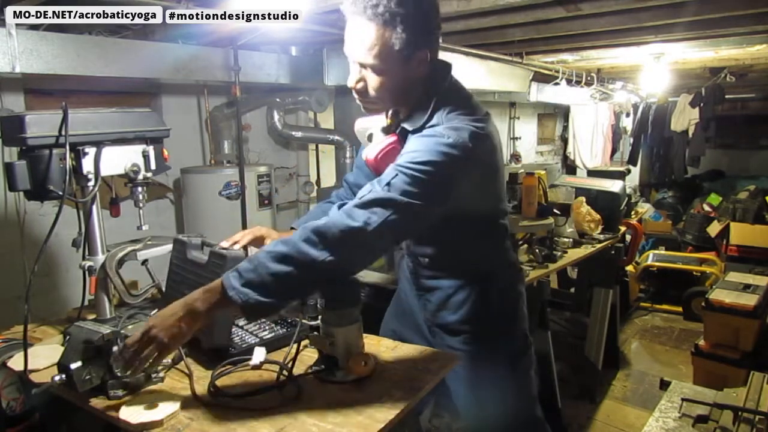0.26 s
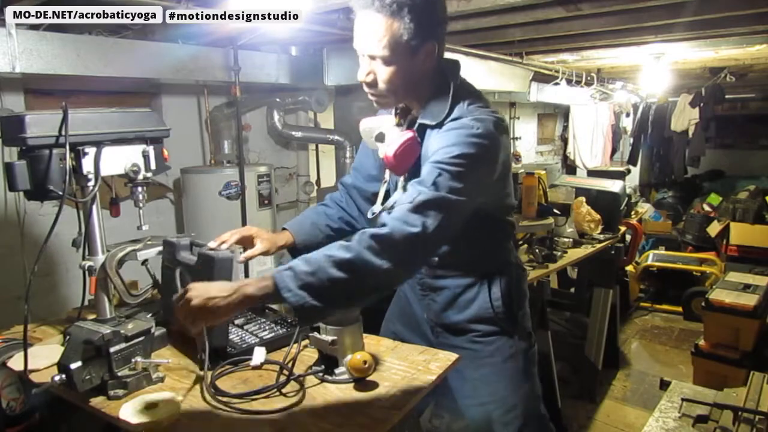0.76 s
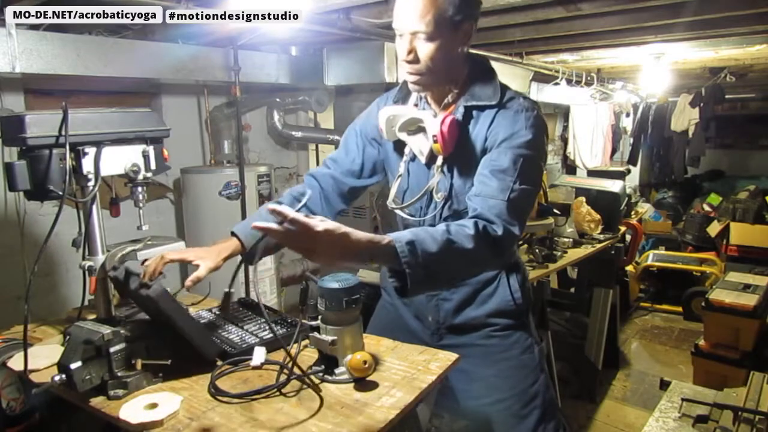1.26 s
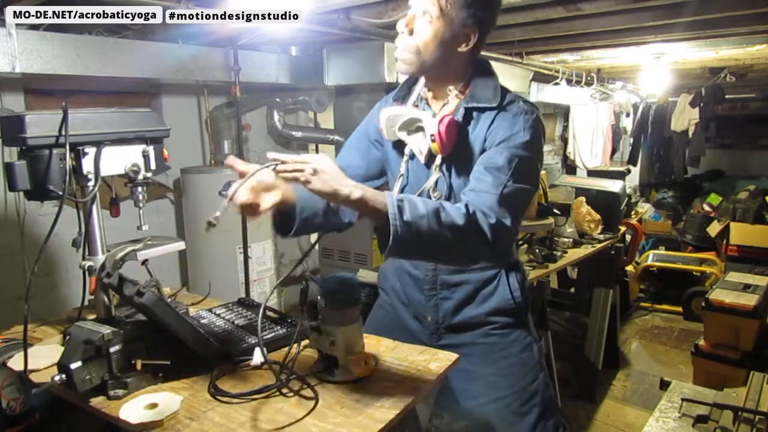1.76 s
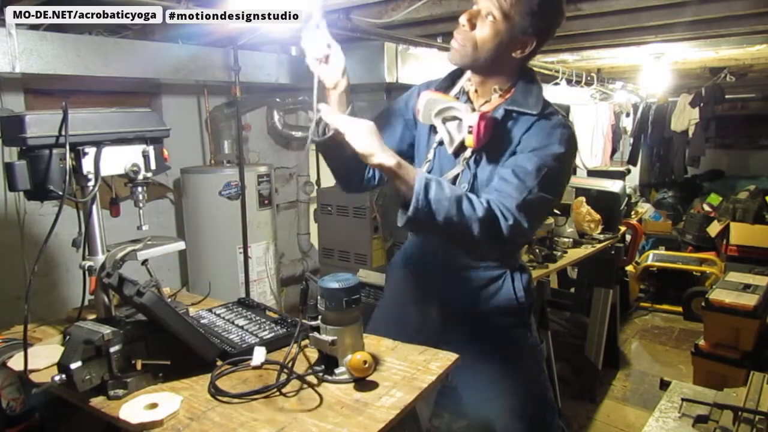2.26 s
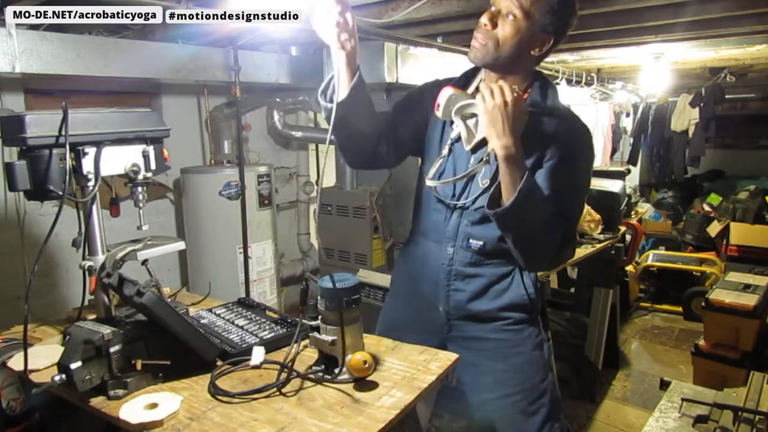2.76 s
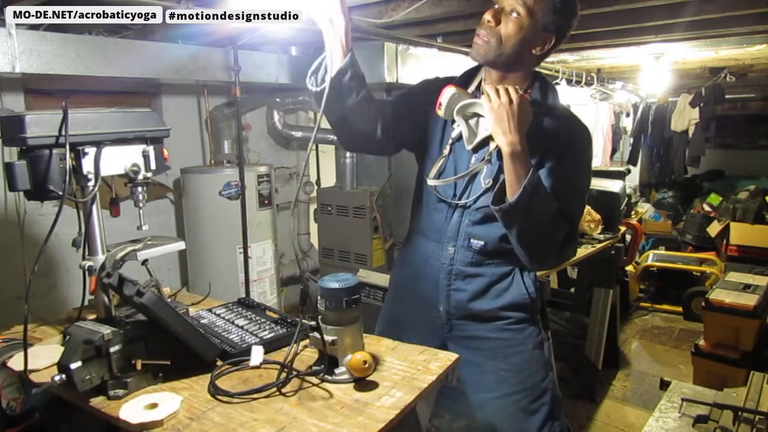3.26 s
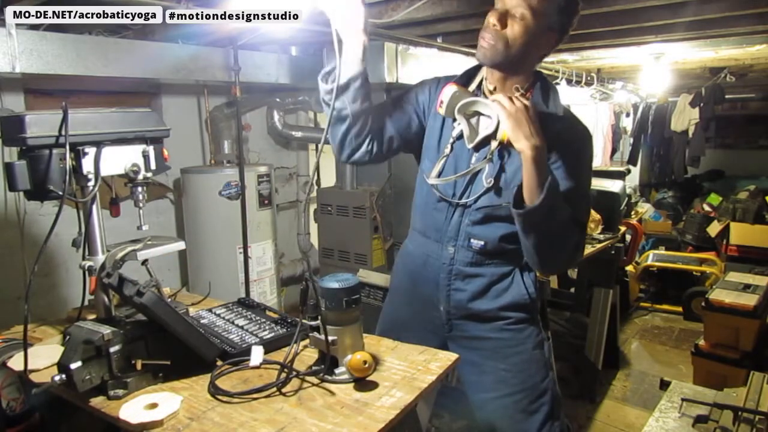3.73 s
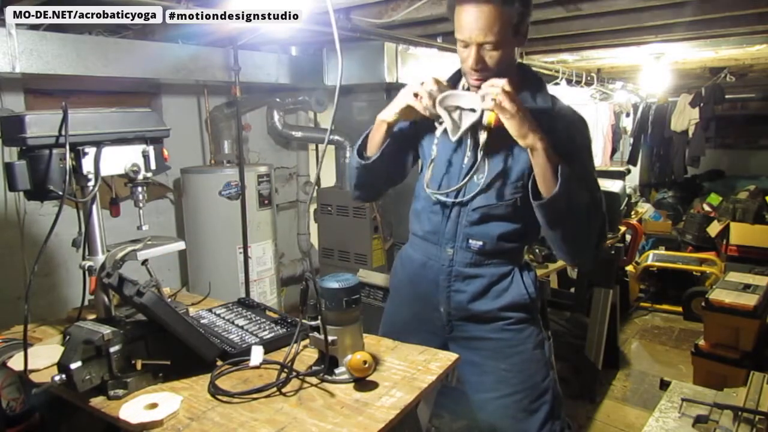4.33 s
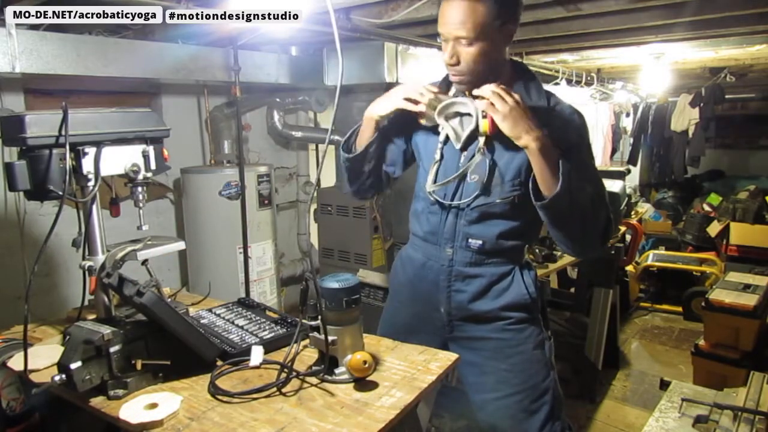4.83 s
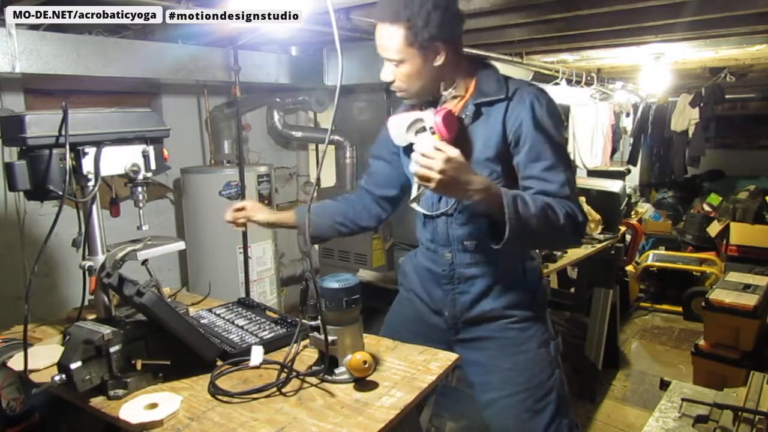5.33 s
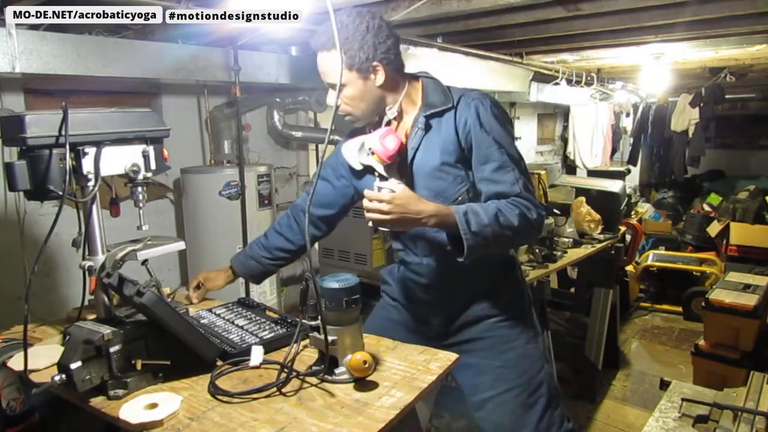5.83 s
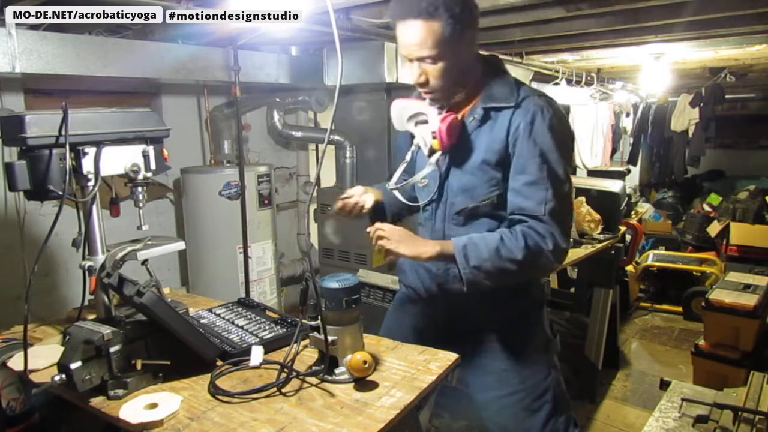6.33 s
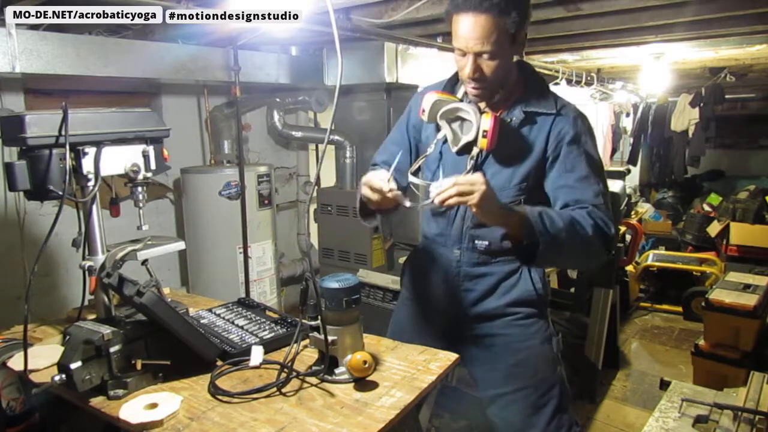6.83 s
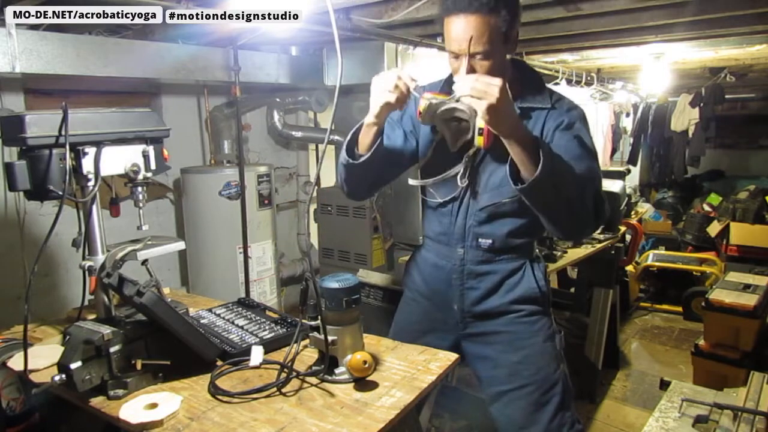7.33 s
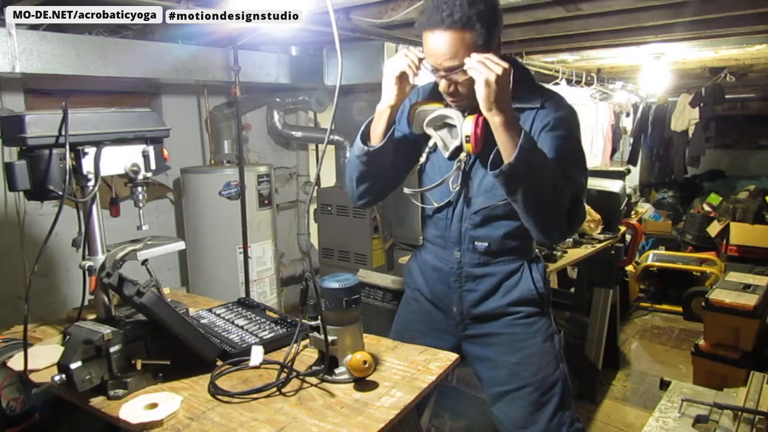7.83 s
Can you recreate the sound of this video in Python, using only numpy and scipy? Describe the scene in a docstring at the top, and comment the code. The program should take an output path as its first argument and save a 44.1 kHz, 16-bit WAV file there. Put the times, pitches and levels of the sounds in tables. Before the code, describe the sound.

In a basement workshop, a sharp case knock, bench thud, clattering ceiling plug, bright mask and glasses clicks, rustling overalls and a soft duct hum.

```python
"""In a low, cluttered basement workshop a hand knocks and drags a plastic tool case on a wooden bench, pushes a
plug into a ceiling socket, and handles a mask and glasses; overalls rustle. Blows are bursts of noise with ringing
modes, drags are random slips ringing a hollow body, and cloth is shaped noise that swells and flickers.
A tail of scattered echoes follows the handling. A distant blower (shaped noise) swells over the microphone hiss."""
import sys
import numpy as np
from scipy import signal
from scipy.io import wavfile
from scipy.ndimage import uniform_filter1d

SR = 44100
rng = np.random.default_rng(int(sys.argv[2]) if len(sys.argv) > 2 else 0)


def unload_audio(sound):
    """Save the sound as a 16-bit wav file, at the path given as the first command line argument."""
    columns = np.transpose(np.atleast_2d(sound))
    # keep every value between -1 and 1, then stretch to whole-number steps
    steps = np.round(np.clip(columns, -1, 1) * 32767)
    wavfile.write(sys.argv[1], SR, steps.astype(np.int16))


N = 356857  # length of the scene in samples


def gain_of(db):
    """Turns decibels into a factor."""
    return 10 ** (np.asarray(db) / 20)


def evened(x):
    """Scales a sound to rms 1."""
    return x / np.sqrt(np.mean(x ** 2) + 1e-20)


def read(points, hz):
    """Reads a table of values against pitch, on a log-frequency axis."""
    f, value = np.transpose(points)
    return np.interp(np.log(hz + 1), np.log(f + 1), value)


def along(rows, t):
    """Reads the columns of a table of curves at the times t."""
    s, *columns = np.transpose(rows)
    return [np.interp(t, s, c) for c in columns]


def add(mix, s, sound):
    """Mixes a two-channel sound in at time s, cutting off what runs past the end."""
    part = mix[:, round(s * SR):][:, :sound.shape[1]]
    part += sound[:, :part.shape[1]]


def band(x, lo_hz, hi_hz, order=3):
    """Keeps only the pitches between two limits."""
    sos = signal.butter(order, [lo_hz, hi_hz], "bandpass", fs=SR, output="sos")
    return signal.sosfilt(sos, x)


def placed(sound, pan_db):
    """Pans a sound between the two ports; positive is towards the left."""
    return sound * gain_of([[pan_db / 2], [-pan_db / 2]])


def swell(t, start, length, skew, point):
    """An arch from silence to 1 and back; skew under 1 peaks early, a higher point is sharper."""
    progress = np.clip((t - start) / length, 0, 1)
    return abs(np.sin(np.pi * progress ** skew)) ** point


def unit(db):
    """Turns a spectrum in dB into magnitudes of total power 1."""
    magnitude = gain_of(db)
    return magnitude / np.linalg.norm(magnitude, axis=0) * np.sqrt(len(db))


def paired(left, other, same):
    """Makes a right channel that is like the left one by the share same (0 is unrelated)."""
    return np.array([left, same * left + np.sqrt(1 - same ** 2) * other])


def noise(shape, same, size):
    """Two-channel noise built from random spectra whose short-time magnitude is shape(hz, t)."""
    hz = np.fft.rfftfreq(size, 1 / SR)[:, None]
    t = np.arange(4 * N // size + 5) * size / 4 / SR
    a, b, c, d = rng.standard_normal((len(t), len(hz), 4)).T
    likeness = np.clip(read(same, hz), -1, 1)
    spectra = paired(a + 1j * b, c + 1j * d, likeness) * shape(hz, t)
    sound = signal.istft(spectra, nperseg=size, noverlap=3 * size // 4)[1]
    return sound[:, :N] / np.sqrt(size / 3)


def ringing(modes):
    """The modes of an object, all set off by one contact at a random spot, peak 1."""
    t = np.arange(SR // 2) / SR
    hz, db, t60 = np.transpose(modes)[:, :, None]
    spot = gain_of(1.34 * rng.standard_normal((len(modes), 1)))  # the spot favours some modes
    ring = (spot * gain_of(db - 60 * t / t60) * np.sin(2 * np.pi * hz * t)).sum(0)
    return ring / abs(ring).max()


def rings(rows, modes):
    """Things that ring on with their modes alone."""
    mix = np.zeros((2, N))
    for s, db in rows:
        add(mix, s, placed(gain_of(db) * ringing(modes), -1.9))
    return mix


def blows(rows, modes, knock, tick_width, ring_db, click_db, crack_t60, pan_db):
    """Each blow is a click, a dense crack and the object's modes, heard in a low knock band and a tick band."""
    t, mix = np.arange(SR // 2) / SR, np.zeros((2, N))
    for s, knock_db, tick_db, tick_at in rows:
        ring = gain_of(ring_db) * ringing(modes)
        shared, left, right = rng.standard_normal((len(t), 3)).T
        click = gain_of(click_db - 60 * t / 0.00092) * shared  # the first contact is the sharpest
        sound = 0
        for level_db, (at, width) in (knock_db, knock), (tick_db, (tick_at, tick_width)):
            edges_hz = 1000 * 2. ** (at + abs(width) * np.array([-.5, .5]))
            lo, hi = np.minimum(edges_hz, [SR / 4, SR / 3])
            own = 3.0 * lo / 6500  # the ports hear the finest cracks differently
            fade = gain_of(-60 * t / (crack_t60 * (1000 / lo) ** 0.033))
            crack = (shared + click + own * np.array([left, right])) * fade
            crack = signal.lfilter([1], [1, -.65], crack)  # two filters soften the treble
            crack = signal.lfilter([.15], [1, -.85], crack)
            rise = np.minimum(t * lo / 0.61, 1)  # low knocks rise slower
            part = band((ring + crack) * rise, lo, hi, order=2)
            sound = sound + gain_of(level_db) * part / abs(part).max()
        add(mix, s, placed(sound, pan_db))
    return mix


def drags(rows, resonances):
    """Stick-slip clicks of uneven size ring a hollow body; the finest grit is heard directly."""
    mix = np.zeros((2, N))
    for start, length, level_db, grit_db in rows:
        t = np.arange(0, length, 1 / SR)
        chance, size, fine = rng.random((N // 10, 3))[:len(t)].T
        slip_size = gain_of(2.05 * np.minimum(-np.log(size + 1e-9), 3.5))
        slips = slip_size * (chance < 600 / SR)  # about 600 slips a second
        slips = evened(slips - slips.mean()) + 2.7 * (fine - .5)
        hollow = sum(gain_of(db) * evened(band(slips, hz - w / 2, hz + w / 2, order=1))
                     for hz, w, db in resonances)
        hollow = evened(band(hollow, 490, 3070, order=2))
        grit = evened(band(signal.lfilter([1], [1, -.85], slips), 2000, 7100, order=2))
        grip = uniform_filter1d(uniform_filter1d(fine - .5, size=300), size=300)
        sound = gain_of(level_db + 2.04 * evened(grip)) * (hollow + gain_of(grit_db) * grit)  # uneven pressure
        # each drag swells quickly, then fades away
        add(mix, start, placed(sound * swell(t, 0, length, skew=0.59, point=1.8), 0.0))
    return mix


def hiss():
    """Steady noise of the widened microphone pair."""
    # colour of the hiss: pitch_hz, relative level_db (per Hz)
    hiss_colour = [(12, -33), (20, -14), (74, 1), (270, -7), (337, -9.5), (388, -9), (1000, -15),
                   (1190, -14.5), (3250, -24), (7730, -27.5), (14700, -35.5), (16000, -40)]
    # left-right likeness: pitch_hz, likeness (1 is identical, below 0 is opposed)
    hiss_same = [(60, -0.76), (180, -0.41), (550, -0.43), (1650, -0.2), (4970, 0.1), (15000, 0.11)]
    return gain_of(-50) * noise(lambda hz, t: unit(read(hiss_colour, hz)), hiss_same, size=2048)


def blower():
    """Air roar through ducts, a fuzzy duct hum and a lumpy rumble, all shaped noise."""
    # strength over time: time_s, roar_db, hum_db
    strength = [(0.0, -70, -64), (1.6, -80, -61), (2.6, -72, -72), (3.5, -60.5, -49), (3.95, -51.5, -59.5),
                (4.6, -52.5, -59.5), (5.1, -53, -53.5), (5.9, -49.5, -53.5), (6.5, -51, -52.5),
                (6.98, -50.5, -51), (7.5, -56, -51.5), (8.09, -69, -56.5)]
    # colour of the roar: pitch_hz, relative level_db (per Hz)
    roar_colour = [(76, -50), (130, -5), (221, -16), (274, -35), (345, -13), (433, -18.5), (769, -13),
                   (3570, -36.5), (4000, -37), (5200, -69.5), (8800, -120)]
    # swells added to the steady rumble: middle_s, half_width_s, added peak_db
    rumble_swells = [(4.05, 0.25, -59), (5.36, 0.086, -54.5), (5.9, 0.15, -55), (6.95, 0.17, -50),
                     (7.5, 0.15, -71)]
    # left-right likeness: pitch_hz, likeness (1 is identical)
    far_same = [(60, 0.1), (240, 0.04), (950, 0.096), (3770, 0.98), (15000, 0.12)]
    hum_hz, hum_width_hz = 278.6, 25
    rumble_hz, rumble_width_hz, steady_rumble_db = 56.5, 55, -60

    def shape(hz, t):
        roar_db, hum_db = along(strength, t)
        lumps = gain_of(steady_rumble_db)
        lumps = lumps + sum(gain_of(db) * np.exp(-((t - s) / half) ** 2) for s, half, db in rumble_swells)
        hum_colour = -10 * np.log10(1 + (2 * (hz - hum_hz) / hum_width_hz) ** 4)
        rumble_colour = -10 * np.log10(1 + (2 * (hz - rumble_hz) / rumble_width_hz) ** 4)
        roar = unit(read(roar_colour, hz)) * gain_of(roar_db)
        hum = unit(hum_colour) * gain_of(hum_db)
        rumble = unit(rumble_colour) * lumps
        return np.sqrt(roar ** 2 + hum ** 2 + rumble ** 2)
    return noise(shape, far_same, size=4096)


def room(x):
    """Echoes: taps of random sign, each band dying at its own speed, in three tails that take turns."""
    # how long echoes last: pitch_hz, t60_s (time to fall by 60 dB)
    echo_time = [(125, 0.5), (500, 0.29), (2000, 0.25), (6000, 0.23), (14000, 0.099)]
    # left-right likeness: pitch_hz, likeness (1 is identical, so the ports share the bass)
    room_same = [(100, 1), (500, 0.58), (2000, 0.07), (10000, 0.069)]
    turns_per_s = 9.0
    out, turn = np.zeros((2, N)), 2 * np.pi * np.arange(N) / SR * turns_per_s
    for k in range(3):
        taps = np.zeros((2, SR // 2))
        at = np.arange(130, SR // 2 - 20, 20)  # one tap somewhere in every 20 samples
        signs = rng.choice([-1., 1.], (2, len(at)))
        np.put_along_axis(taps, at + rng.integers(0, 20, (2, len(at))), signs, 1)
        hz, t, (left, other) = signal.stft(taps, SR, nperseg=256)
        spectra = paired(left, other, np.clip(read(room_same, hz), 0, 1)[:, None])
        fade = gain_of(-60 * t / read(echo_time, hz)[:, None])
        tail = signal.istft(spectra * fade, SR, nperseg=256)[1]
        tail = tail / np.linalg.norm(tail[0])
        share = np.sqrt(2 / 3) * np.cos(turn + k * np.pi / 3)  # the three powers add up to 1
        out += signal.oaconvolve((x.mean(0) * share)[None], tail, axes=1)[:, :N]
    return out


def rustle():
    """Fabric rubbing: wide hiss that swells with each movement and flickers as fibres catch."""
    # movements of cloth, straps and cable: start_s, length_s, peak_db,
    # tilt_db (per octave; higher is brighter)
    moves = [(0.0, 0.2, -56.5, -1), (1.198, 0.08, -56.5, -6.5), (1.333, 0.082, -55, -1),
             (1.43, 0.16, -55.5, -4.5), (1.74, 0.12, -67, -4), (1.9, 0.13, -63, 4), (2.03, 0.23, -62, 6),
             (2.25, 0.37, -64, 1.5), (3.735, 0.38, -57, -3), (3.902, 0.11, -47, 1), (3.997, 0.052, -48, 5),
             (4.053, 0.14, -57.5, -1), (4.16, 0.067, -56, 4), (4.23, 0.074, -57, -1),
             (4.357, 0.17, -54.5, 5.5), (4.515, 0.12, -55.5, -1.5), (4.594, 0.054, -45.5, 3),
             (4.633, 0.14, -49.5, -0.5), (5.05, 0.29, -64, 0), (5.39, 0.25, -63.5, -1),
             (5.895, 0.23, -56.5, -3), (6.177, 0.25, -63, -2), (6.406, 0.062, -42, -11.5),
             (6.488, 0.1, -54.5, -4), (6.563, 0.13, -57.5, -4), (6.714, 0.15, -53.5, -0.5),
             (6.81, 0.16, -53, -2.5), (7.187, 0.1, -61, -1), (7.598, 0.35, -56, -4)]
    # colour of the cloth before the tilt: pitch_hz, relative level_db (per Hz)
    cloth_colour = [(880, -71), (1500, -4), (2490, -2.5), (3310, -2.5), (4730, -1.5), (10100, -5),
                    (14900, -15.5), (16000, -34)]

    def shape(hz, t):
        start, length, level_db, tilt_db = np.transpose(moves)
        tilted = read(cloth_colour, hz) + tilt_db * np.log2((hz + 50) / 6000)
        colours = unit(tilted) * gain_of(level_db)
        swells = swell(t, start[:, None], length[:, None], skew=0.7, point=0.8)
        flicker = gain_of(1.9 * rng.standard_normal(len(t)))
        return np.sqrt(colours ** 2 @ swells ** 2) * flicker
    return noise(shape, [(1000, 0.53), (10000, 0.42)], size=256)


def glasses_jingles():
    """The frame of the glasses rings on a few high modes."""
    # jingles: start_s, peak_db
    jingles = [(6.5156, -42), (6.7555, -40), (6.8794, -39.5), (7.0828, -48.5), (7.232, -53)]
    # modes of the frame: pitch_hz, relative level_db, t60_s
    frame_modes = [(3525, 4, 0.084), (2700, -6, .04), (4630, -6, 0.051), (5600, -8, 0.13)]
    return rings(jingles, frame_modes)


def gear_knocks():
    """Small hard parts tap with short, bright modes."""
    # blows: start_s, knock_db (body), tick_db (contact), tick_pitch (octaves above 1 kHz)
    gear_hits = [(1.339, -53, -34.5, 3), (1.614, -56, -61, -1), (3.912, -24.5, -13, 4),
                 (3.982, -32, -32, 1.5), (4.051, -52, -37, -0.5), (4.256, -55, -41.5, 0),
                 (4.597, -38, -36, 3.4), (4.603, -28, -23, 3), (4.683, -25.5, -48, 5),
                 (5.905, -15, -50, -3), (6.136, -44, -35.5, 3), (6.409, -43, -21.5, 2.5),
                 (6.514, -50, -38.5, 3.5), (6.587, -50, -42, 2.5), (6.752, -52, -31.5, 3.5),
                 (6.811, -56, -43, 3.5), (6.864, -59, -32, 3), (6.884, -59, -30.5, 3),
                 (7.082, -55, -40.5, 3.3), (7.203, -62, -42, 3.3), (7.655, -40, -41.5, 3),
                 (7.834, -60, -43, 3)]
    # modes of the parts: pitch_hz, relative level_db, t60_s
    gear_modes = [(745, -25, 0.051), (1640, -5, 0.02), (1900, 6, 0.18), (2370, 3, 0.074), (2857, 22, 0.021),
                  (3390, 9, 0.065), (4640, 7, 0.067), (5700, -38, .06)]
    return blows(gear_hits, gear_modes, knock=(0.9, 1.3), tick_width=1.28, ring_db=-3.0, click_db=17.5,
                 crack_t60=0.038, pan_db=-2.0)


def shelf_handling():
    """A shelf is knocked, and a drag rings its hollow resonances."""
    # blows: start_s, knock_db (body), tick_db (contact), tick_pitch (octaves above 1 kHz)
    shelf_hits = [(2.371, -43.5, -66, 0.8), (2.394, -47, -60, 1.7), (2.468, -32.5, -46, 0.28),
                  (5.783, -19, -25.5, 1.1), (5.795, -28, -37, 0.49), (5.848, -29.5, -47, 1.4),
                  (5.86, -54, -30, 0.58), (5.88, -41, -35, 0.5), (5.947, -51, -42, 0.093)]
    # modes of the shelf: pitch_hz, relative level_db, t60_s
    shelf_modes = [(402, -14.5, 0.11), (525, -24, 0.4), (547, -14, 0.17), (621, -13, 0.09),
                   (911, -5, 0.043), (1056, -41, 0.15)]
    # drags: start_s, length_s, level_db, grit_db (relative to the hollow sound)
    shelf_pulls = [(5.83, 0.1, -34, -12)]
    # hollow resonances: pitch_hz, width_hz, relative level_db
    shelf_hollow = [(553, 52, 10), (910, 300, 12), (1420, 310, -15)]
    knocks = blows(shelf_hits, shelf_modes, knock=(-1.05, 1.1), tick_width=2.55, ring_db=3.5, click_db=22.0,
                   crack_t60=0.089, pan_db=0.0)
    return knocks + drags(shelf_pulls, shelf_hollow)


def socket_plugging():
    """The plug knocks the ceiling socket, whose metal box pings while the joists boom."""
    # blows: start_s, knock_db (body), tick_db (contact), tick_pitch (octaves above 1 kHz)
    socket_hits = [(3.135, -18, -16, 0.5), (3.145, -18, -27, 3.5), (3.316, -29, -35, 1.1),
                   (3.325, -25, -29, 3), (3.3445, -19.5, -13, 2.15), (3.364, -26, -12.5, 3),
                   (3.443, -15.5, -27, 2.6), (3.451, -16.5, -34.5, 3.5), (3.463, -24, -34, 0.6),
                   (3.479, -30, -29, -1.2), (3.576, -38, -53, -4), (3.602, -36, -40.5, 0.9)]
    # modes of the socket: pitch_hz, relative level_db, t60_s
    socket_modes = [(176, 0, 0.21), (200.5, -8, 0.89), (246.4, 6, 0.078), (339, 0, 0.2), (470, -35, 0.13),
                    (532.5, -6.5, 0.36), (617, -0.5, 0.1), (779, -8, 0.08), (1070, -27, 0.041),
                    (1500, 18, 0.012)]
    # pings of the metal socket box: start_s, peak_db
    pings = [(3.1373, -29.5), (3.1457, -48), (3.4406, -41)]
    # modes of the box: pitch_hz, relative level_db, t60_s
    box_modes = [(4430, -5, .08), (4510, -1, .14), (4600, 0, .2), (4700, -3, .1), (8888, -9, .07),
                 (8750, -11, .05)]
    # booms of the ceiling joists: start_s, peak_db
    booms = [(3.136, -42), (3.325, -35), (3.443, -34)]
    # modes of the joists: pitch_hz, relative level_db, t60_s
    joist_modes = [(54.8, -2, 1), (80.3, 3, 1), (108.2, 9.5, 0.54)]
    knocks = blows(socket_hits, socket_modes, knock=(-1.5, 2.4), tick_width=0.97, ring_db=-3.0, click_db=12.0,
                   crack_t60=0.038, pan_db=-2.7)
    return knocks + rings(pings, box_modes) + rings(booms, joist_modes)


def bench_knock():
    """The wooden bench is struck and rings on low modes."""
    # blows: start_s, knock_db (body), tick_db (contact), tick_pitch (octaves above 1 kHz)
    bench_hits = [(1.403, -18, -20.5, 0.43)]
    # modes of the bench: pitch_hz, relative level_db, t60_s
    bench_modes = [(124.6, -8.5, 0.36), (182.6, -9, 0.63), (292, -2, 0.2), (395, -7.5, 0.13),
                   (575, 8.5, 0.083), (714, -20, 0.06), (1040, 6, 0.052)]
    return blows(bench_hits, bench_modes, knock=(-1.4, 2.2), tick_width=1.55, ring_db=4.0, click_db=25.0,
                 crack_t60=0.048, pan_db=4.0)


def case_handling():
    """The hollow plastic case is knocked, then scrapes and thumps as it is dragged."""
    # blows: start_s, knock_db (body), tick_db (contact), tick_pitch (octaves above 1 kHz)
    case_hits = [(0.148, -13, -9.5, 0.78), (0.1555, -9.5, -1.5, 0.89)]
    # modes of the case: pitch_hz, relative level_db, t60_s
    case_modes = [(355, -5, 0.13), (507, 2, 0.16), (640, -22, 0.074), (940, -5, 0.076), (1280, 7, 0.09),
                  (1670, -23, .06), (1940, 19, 0.068)]
    # drags: start_s, length_s, level_db, grit_db (relative to the hollow sound)
    case_pulls = [(0.39, 0.17, -37, -29), (0.49, 0.15, -50.5, -8), (0.572, 0.17, -30.5, -19.5),
                  (0.66, 0.1, -36, -17), (0.72, 0.14, -53, -5)]
    # hollow resonances: pitch_hz, width_hz, relative level_db
    case_hollow = [(368, 55, -5), (395, 25, -4), (544, 130, -6.5), (746, 370, -10.5), (1067, 70, -13.5),
                   (1650, 400, -26)]
    # thumps while dragged: start_s, peak_db
    thumps = [(0.621, -25.5), (0.635, -34)]
    # modes of the shell: pitch_hz, relative level_db, t60_s
    shell_modes = [(353, 15, 0.17), (406, -25, .1)]
    knocks = blows(case_hits, case_modes, knock=(-0.4, 1.6), tick_width=2.09, ring_db=-14.0, click_db=14.0,
                   crack_t60=0.052, pan_db=0.0)
    return knocks + drags(case_pulls, case_hollow) + rings(thumps, shell_modes)


def scene():
    """The blower, the rustle, and the handling sounds with their echo in the basement."""
    # in the blows, knock is (octaves above 1 kHz, width in octaves); tick_width is in octaves, crack_t60 in s
    near = glasses_jingles() + gear_knocks() + shelf_handling()
    near += socket_plugging() + bench_knock() + case_handling()
    return blower() + rustle() + gain_of(-2.5) * room(near) + near


def record(dry):
    """Adds the microphone hiss, the uneven bass of its ports, then the band limit."""
    balance_hz, bass_balance_db, edge_hz = 1500, -1.5, 15900
    heard = dry + hiss()
    bass = signal.lfilter(*signal.butter(1, balance_hz, fs=SR), heard)
    heard = heard - bass + placed(bass, bass_balance_db)  # the right port hears more bass
    low_pass = signal.firwin(511, edge_hz, window=("kaiser", 9), fs=SR)
    return signal.oaconvolve(heard, low_pass[None], "same")


dry = scene()
out = record(dry)
unload_audio(out)
```